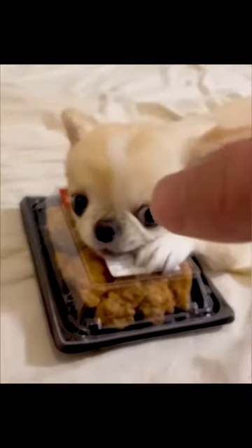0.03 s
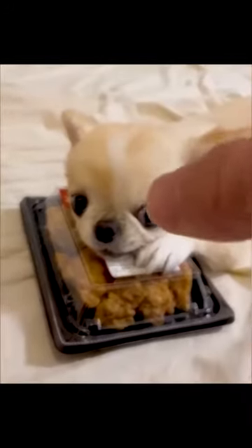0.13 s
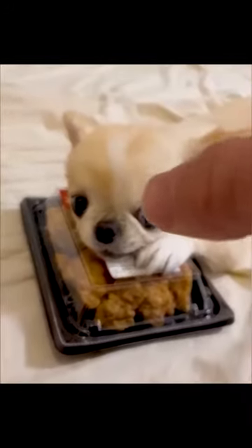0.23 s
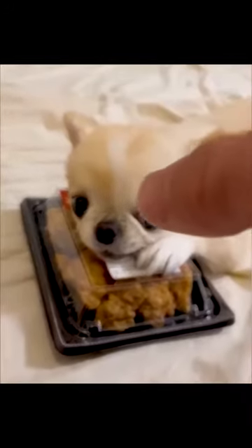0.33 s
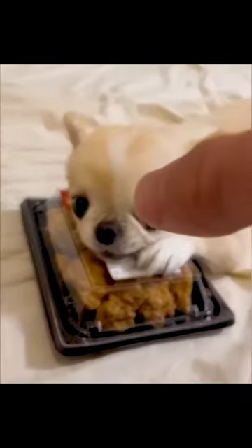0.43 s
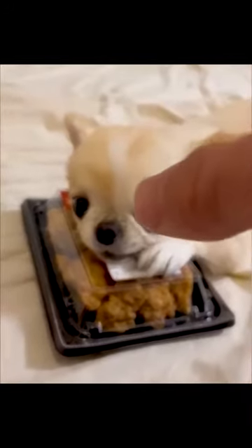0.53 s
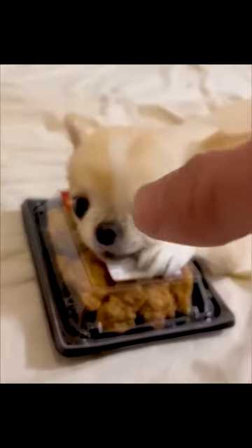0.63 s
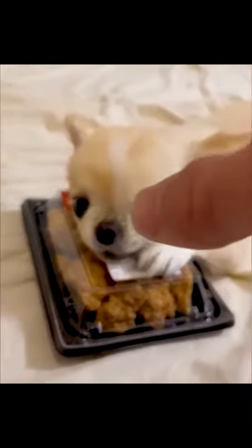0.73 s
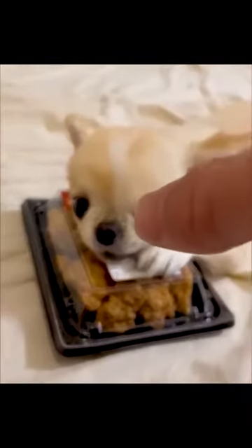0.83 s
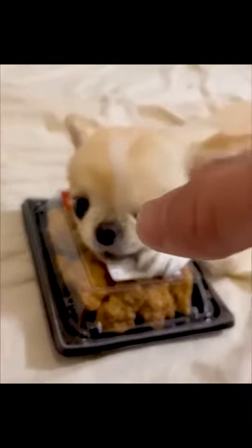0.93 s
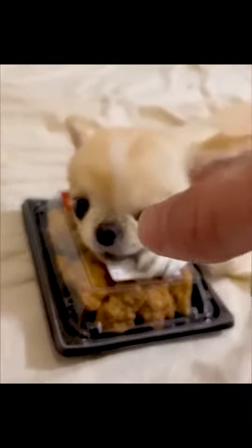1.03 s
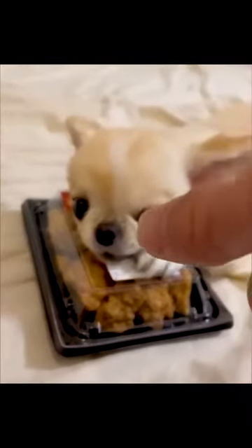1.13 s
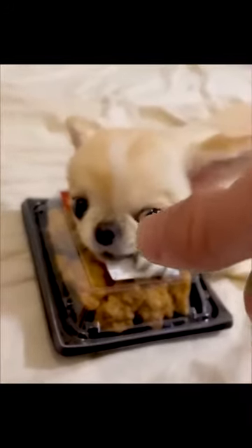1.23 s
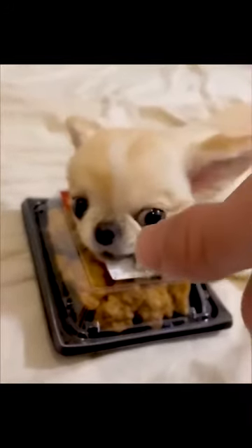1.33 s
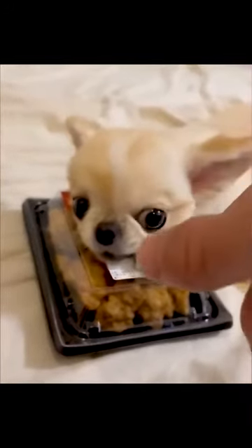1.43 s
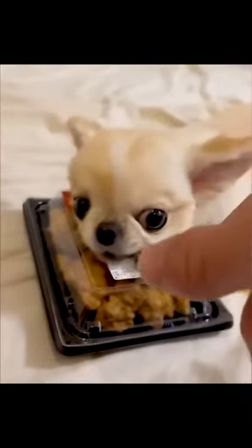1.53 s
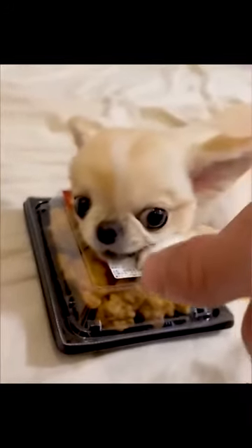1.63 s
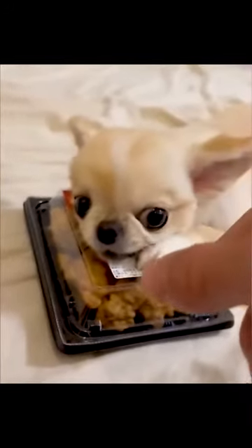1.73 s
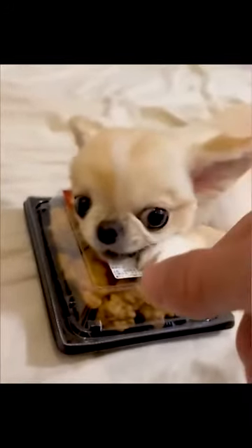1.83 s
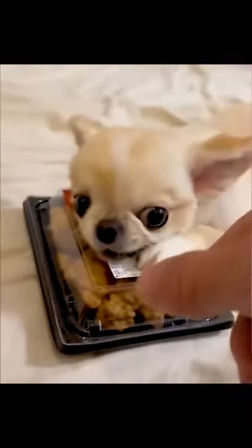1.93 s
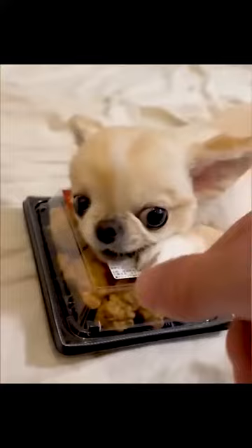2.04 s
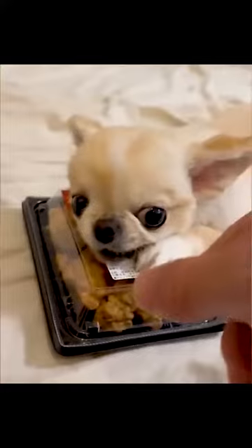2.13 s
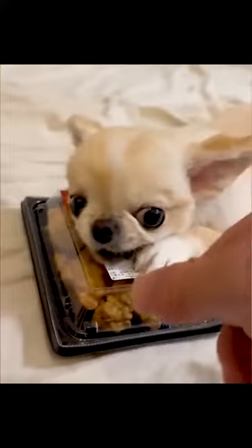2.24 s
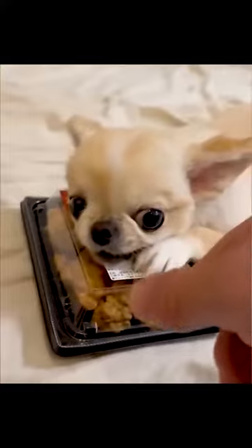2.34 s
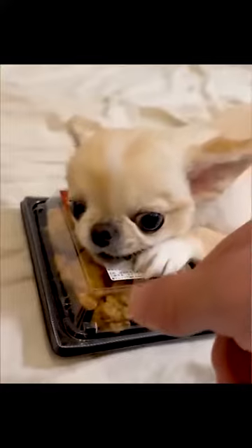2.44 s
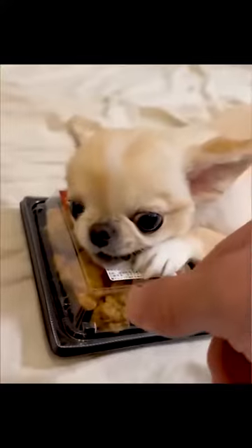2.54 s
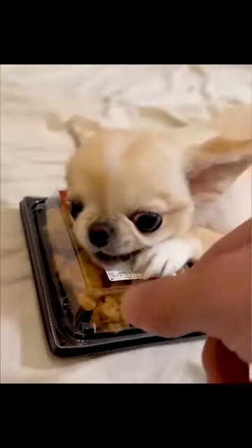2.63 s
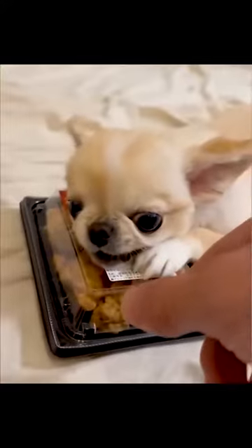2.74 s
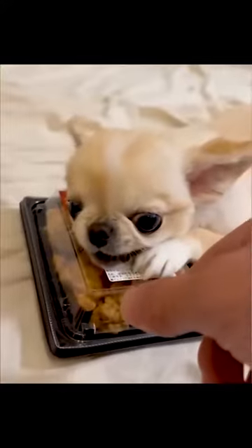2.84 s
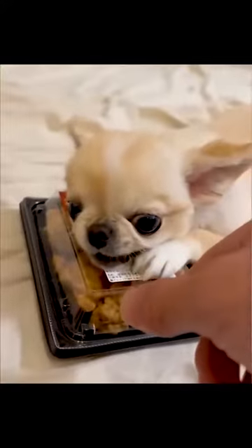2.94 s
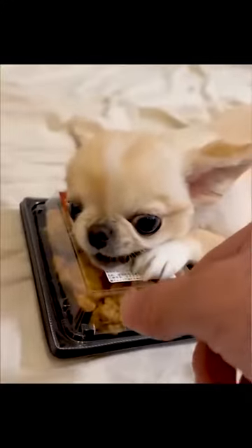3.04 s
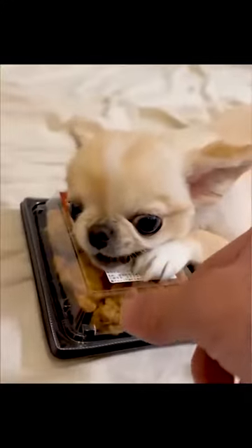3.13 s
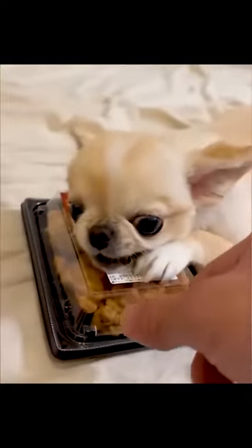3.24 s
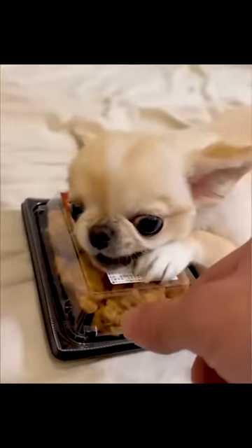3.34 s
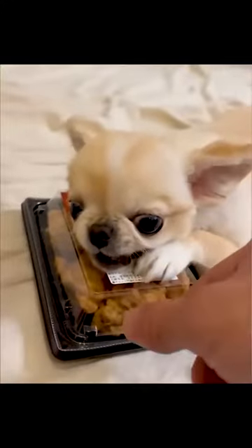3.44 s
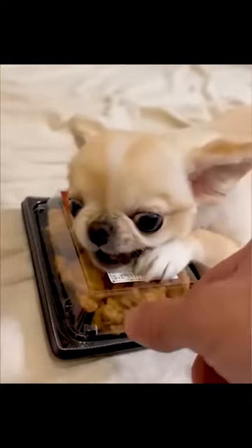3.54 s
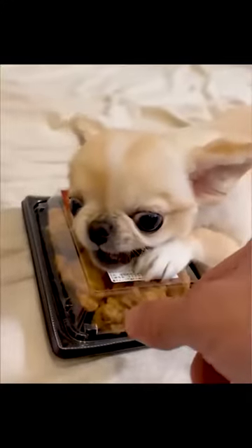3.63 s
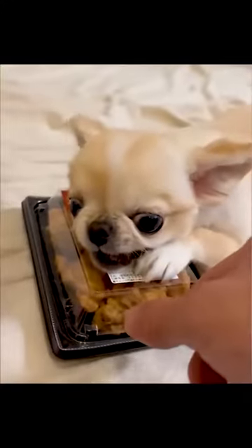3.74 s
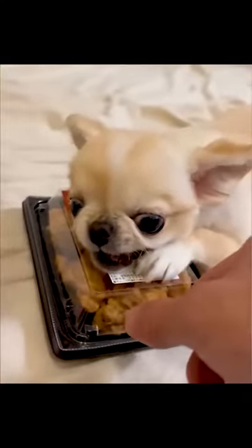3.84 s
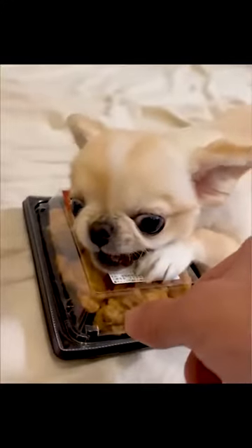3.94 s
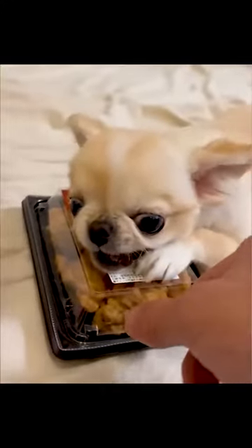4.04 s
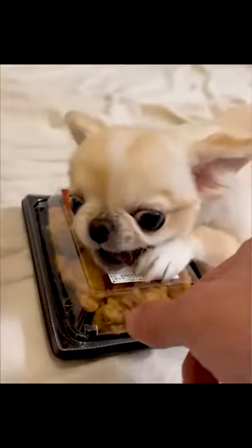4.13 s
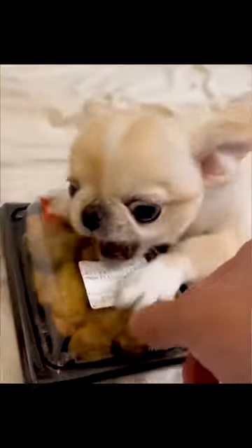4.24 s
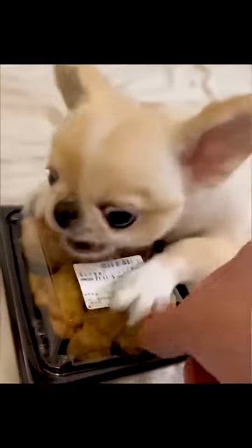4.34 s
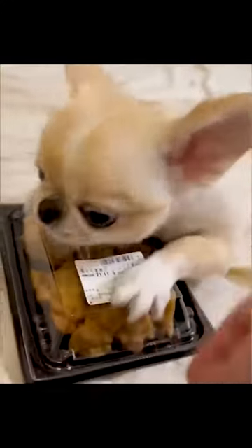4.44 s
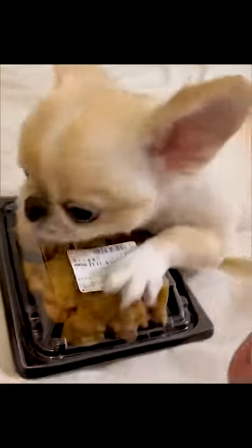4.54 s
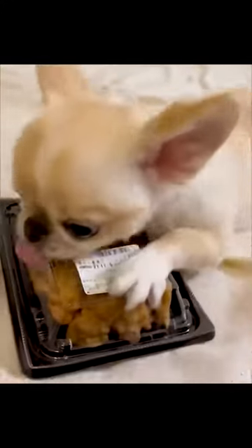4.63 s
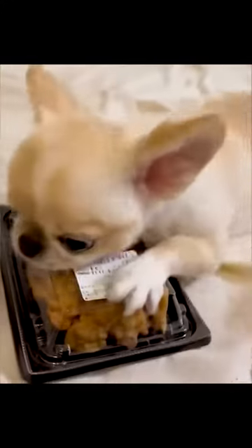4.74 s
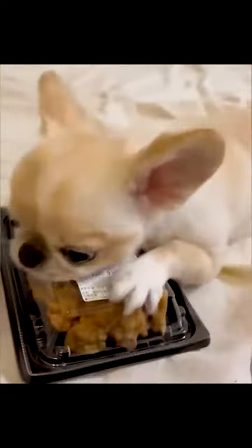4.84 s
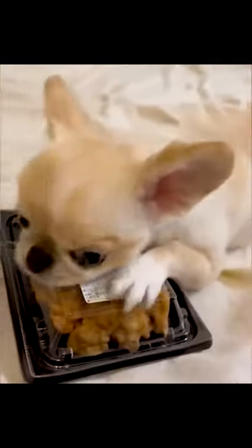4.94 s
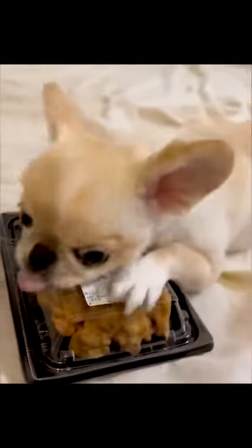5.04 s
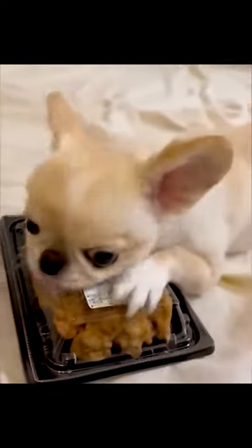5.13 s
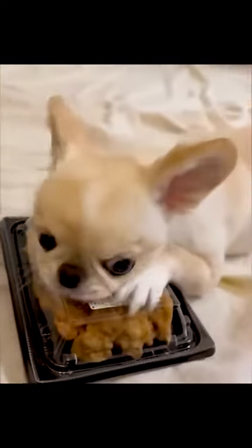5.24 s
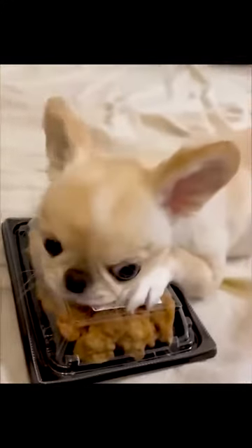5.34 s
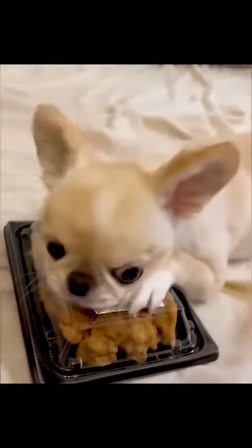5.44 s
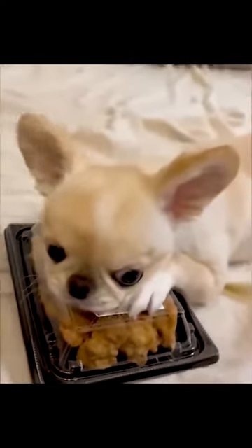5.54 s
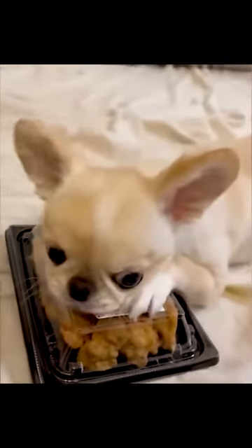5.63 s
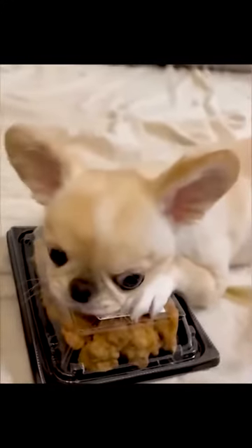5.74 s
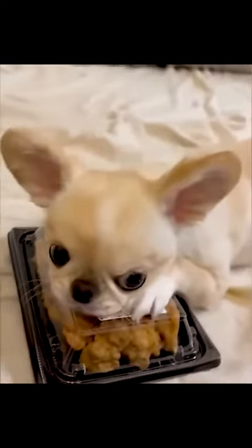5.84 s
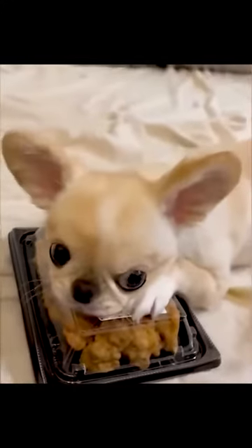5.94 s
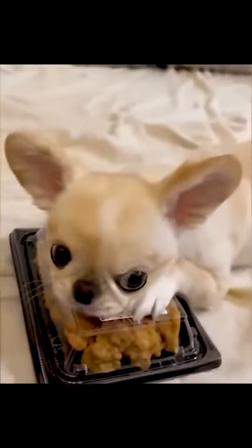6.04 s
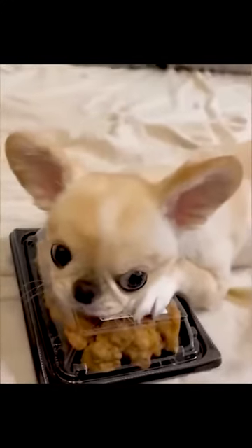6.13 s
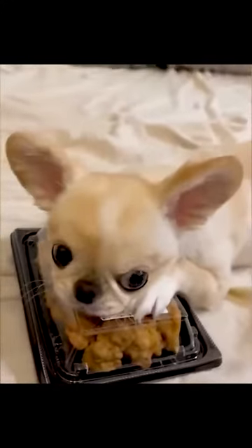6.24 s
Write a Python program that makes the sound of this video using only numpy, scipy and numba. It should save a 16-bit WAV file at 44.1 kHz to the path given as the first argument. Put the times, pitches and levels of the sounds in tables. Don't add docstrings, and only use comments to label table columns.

```python
import sys
import numpy as np
from scipy import signal
from scipy.fft import rfft, irfft
from scipy.io import wavfile
from scipy.ndimage import uniform_filter1d
from numba import njit

SR = 44100
rng = np.random.default_rng(int(sys.argv[2]) if len(sys.argv) > 2 else 0)


def to_wav(s):
    ch = np.atleast_2d(s).T
    pcm = np.round(np.clip(ch, -1, 1) * 32767)
    wavfile.write(sys.argv[1], SR, pcm.astype(np.int16))


def gain_from_db(level_db):
    decades = np.asarray(level_db, float) / 20
    return 10 ** decades


N = 276507
T = np.arange(N) / SR


def curve(table):
    s, *columns = np.transpose(table)
    return [np.interp(T, s, c) for c in columns]


def during(table):
    inside = (T > table[0][0]) & (T < table[-1][0])
    return uniform_filter1d(1. * inside, size=1300)


@njit
def svf(x, hz, width_hz):
    y, b, l = np.empty(len(x)), 0., 0.
    for i in range(len(x)):
        g, k = np.tan(np.pi * hz[i] / SR), width_hz[i] / hz[i]
        v = (b + g * (x[i] - l)) / (1 + g * (g + k))
        b, l, y[i] = 2 * v - b, l + 2 * g * v, k * v
    return y


def ring(x, hz, width_hz):
    narrow = svf(x + 1e-18, hz * np.ones(N), width_hz * np.ones(N))
    return narrow * np.sqrt(SR / np.pi / width_hz)


def steep(x, hz, width_hz, skirt_hz):
    return svf(ring(x, hz, width_hz), hz * np.ones(N), skirt_hz * np.ones(N))


def modes(x, table):
    return sum((-1) ** k * gain_from_db(db) * ring(x, hz, width_hz) for k, (hz, width_hz, db) in enumerate(table))


def high(x, hz):
    return signal.sosfilt(signal.butter(4, hz, "high", fs=SR, output="sos"), x)


def flicker(rate_hz, depth_db):
    k = int(SR / rate_hz)
    steps = np.repeat(rng.standard_normal(N // k + 1), k)
    return gain_from_db(depth_db * uniform_filter1d(steps, k)[:N])


# (time [s], level [dB])
HUM_LEVEL = [(0.0, -65.5), (2.6, -62), (3.0, -68), (4.2, -68), (5.27, -64.5), (6.27, -66.5)]
# (frequency [Hz], density [dB per Hz])
HUM_SPECTRUM = [(12, -38), (20, -18.5), (58, -4.5), (242, -21.5), (440, -21.5), (1160, -32.5), (1360, -40),
                (14000, -49)]


def room_tone():
    f = np.fft.rfftfreq(N, 1 / SR) + 1
    hz, db = np.transpose(HUM_SPECTRUM)
    colour = gain_from_db(np.interp(np.log(f), np.log(hz), db))
    mid, side = rfft(rng.standard_normal((2, N))) * colour
    tone = irfft(mid + np.clip(f / 900, .25, 1) * side * np.array([[1], [-1]]), N)
    return tone / np.std(tone) * gain_from_db(curve(HUM_LEVEL)[0] - 2.0) * flicker(27, 2.0)


# (time [s], length [s], level [dB], start [Hz], end [Hz])
SQUEAK_STROKES = [(.049, 0.011, -61.5, 886, 947), (0.095, 0.0076, -72, 927, 1000),
                  (0.138, 0.013, -64, 885, 950), (0.182, 0.007, -66, 850, 904),
                  (0.266, 0.013, -64.5, 808, 898), (.309, 0.0084, -63, 877, 970),
                  (1.512, .016, -58, 1219, 1073), (1.588, 0.043, -58.5, 1552, 1330),
                  (1.637, 0.039, -59, 1266, 946), (1.932, 0.024, -63, 950, 1058),
                  (1.968, 0.027, -69.5, 800, 920)]
# (time [s], length [s])
FLUTTER_STROKES = [(.402, 0.0377), (.443, 0.033), (.481, 0.0336), (.525, .036), (.578, 0.0242),
                   (.618, 0.03), (.651, 0.046), (.695, .034), (.748, 0.025), (.786, 0.041), (.868, .085),
                   (.955, 0.03), (.984, 0.04), (1.03, 0.031), (1.074, 0.063), (1.142, 0.027),
                   (1.173, 0.027), (1.212, 0.026), (1.239, 0.025), (1.265, 0.0232), (1.291, .029),
                   (1.342, .034), (1.379, 0.072), (1.451, 0.041), (1.689, .028), (1.731, 0.037),
                   (1.775, 0.031), (1.822, 0.038), (1.86, 0.023)]
# (time [s], level [dB])
BREATH_PULL = [(.4, -60), (.7, -59), (.8, -59.5), (1.15, -59), (1.32, -61.5), (1.449, -59), (1.9, -63)]
FLUTTER_HZ, FLUTTER_ARCH_HZ, FLUTTER_SPREAD_HZ, FLUTTER_SPREAD_DB = 826, 174, 53, 3.5


def breaths():
    chance = rng.standard_normal((len(FLUTTER_STROKES), 4))
    starts = np.array(FLUTTER_STROKES)[:, 0]
    db = np.interp(starts, *np.transpose(BREATH_PULL)) + FLUTTER_SPREAD_DB * chance[:, 0]
    arch = FLUTTER_HZ + FLUTTER_SPREAD_HZ * chance[:, 1:] + FLUTTER_ARCH_HZ * np.array([0, 1, 0])
    flutter = list(np.column_stack([FLUTTER_STROKES, db, arch]))
    return flutter + [(s, length, level, a, (a + b) / 2, b) for s, length, level, a, b in SQUEAK_STROKES]


# (time [s], air share [0-1])
WHISTLE_AIR = [(0, .1), (.45, .16), (.6, .6), (1.0, .4), (1.5, .6), (1.51, .1), (1.64, .25), (1.72, .6),
               (1.95, .25)]
# (frequency [Hz], width [Hz], level [dB])
NOSE_MODES = [(950, 455, -0.5), (1443, 790, -3), (2320, 320, -10), (4400, 340, -17.5)]


def whistle():
    hz, gain = np.full(N, 900.), np.zeros(N)
    for s, length, db, *arch in breaths():
        inside = slice(int(s * SR), int((s + length + 0.001464) * SR))
        u = np.linspace(-.25, 2.25, len(T[inside]))
        hz[inside] = np.polyval(np.polyfit(np.arange(3), arch, 2), u)
        gain[inside] = gain_from_db(db)
    gain = uniform_filter1d(gain, size=150)
    air, = curve(WHISTLE_AIR)
    wobble = 1 + 0.1054 * air * uniform_filter1d(rng.standard_normal(N), size=200) * np.sqrt(200)
    phase = 2 * np.pi * np.cumsum(uniform_filter1d(hz, size=150) * wobble) / SR
    buzz = sum(np.sin(k * phase) + air * np.sin((k + .5) * phase) for k in (1, 2, 3))
    squeak = gain_from_db(-17.0) * modes(buzz, NOSE_MODES)
    hoarse = high(modes(rng.standard_normal(N), NOSE_MODES), 460) * flicker(130, 3.2)
    return gain * (2.11 * np.sqrt(1 - air) * squeak + 1.06 * np.sqrt(air) * hoarse)


# (start [s], roughness [0-1], mouth resonance width [Hz])
POSTURE_STEPS = [(2.2, .12, 280), (3.565, .06, 120), (4.17, .1, 200), (4.21, .9, 260), (4.47, .25, 220),
                 (4.62, .14, 130), (4.83, .06, 110), (4.885, .18, 150), (5.1, .4, 200), (5.22, .2, 250),
                 (5.335, .3, 300), (5.42, .15, 300)]


def posture(values):
    starts = np.array(POSTURE_STEPS)[:, 0]
    now = np.maximum(np.searchsorted(starts, T) - 1, 0)
    return uniform_filter1d(np.array(values, float).T[:, now], size=660)


# (time [s], length [s], level [dB])
GROWL_STROKES = [(2.267, 0.011, -26), (2.316, 0.0078, -27), (2.362, 0.012, -29), (2.396, 0.028, -26.5),
                 (2.433, 0.041, -29), (2.473, 0.046, -30), (2.521, 0.042, -29.5), (2.571, 0.031, -31),
                 (2.624, 0.033, -30), (2.674, 0.021, -29.5), (2.719, 0.02, -30), (2.771, 0.012, -27),
                 (2.811, 0.027, -29.5), (2.862, 0.019, -31.5), (2.887, 0.035, -28), (2.96, 0.023, -27.5),
                 (2.989, .066, -29), (3.084, .061, -30), (3.149, 0.024, -31), (3.242, .013, -29),
                 (3.463, 0.0074, -28), (3.501, 0.012, -26.5), (3.542, 0.017, -27)]
SNARL_STROKES = [(3.571, 0.041, -19), (3.61, 0.03, -18.5), (3.649, 0.036, -18.5), (3.686, .048, -16),
                 (3.734, 0.046, -16.5), (3.785, 0.033, -17), (3.819, 0.032, -17), (3.851, .048, -17),
                 (3.921, 0.027, -16), (3.966, 0.027, -17), (3.992, 0.039, -18), (4.029, 0.038, -18),
                 (4.097, 0.022, -16), (4.122, 0.063, -20), (4.177, 0.025, -27.5), (4.221, 0.031, -34),
                 (4.249, 0.029, -24), (4.273, 0.048, -18.5), (4.311, 0.033, -17.5), (4.344, 0.049, -16.5),
                 (4.39, 0.022, -18), (4.49, 0.0039, -16.5)]
GRUMBLE_STROKES = [(4.517, 0.027, -20), (4.554, 0.051, -31), (4.637, 0.031, -34.5), (4.683, 0.0405, -28.5),
                   (4.736, 0.035, -24), (4.787, 0.04, -25.5), (4.84, .039, -24.5), (4.882, 0.056, -34),
                   (4.953, 0.053, -27.5), (5.005, .042, -31.5), (5.047, .045, -29), (5.11, 0.016, -27),
                   (5.129, 0.029, -28), (5.162, 0.0434, -28), (5.238, 0.051, -30), (5.286, 0.044, -44),
                   (5.347, .004, -57), (5.374, 0.016, -49.5), (5.453, 0.0051, -40)]
# (time [s], level [dB])
FLAP_CLICKS = [(2.236, -33.5), (3.058, -33), (3.217, -26.5), (3.338, -26), (3.419, -26)]
# (time [s], pitch [Hz])
GROWL_PITCH = [(2.24, 271.7), (2.62, 280.6), (2.72, 252.4), (2.92, 266.3), (3.25, 241.7), (3.33, 271),
               (3.52, 262.7)]
SNARL_PITCH = [(3.58, 322), (3.7, 333.3), (4.1, 292.3), (4.165, 261.2), (4.205, 156.3), (4.23, 124.2),
               (4.45, 125.8), (4.48, 261.6), (4.545, 270.8)]
GRUMBLE_PITCH = [(4.56, 210.9), (4.61, 182.6), (4.67, 183.2), (4.74, 239.7), (4.86, 246.6), (5.08, 205.3),
                 (5.18, 179.5), (5.23, 125.3), (5.46, 121)]
STROKE_FADE_DB = (-1.5, -0.17, -2)
STROKE_GLIDE = (-.02, -.01, .035)
FLAP_POP_DB = (1.5, -2, 1.65)
CLICK_S, STROKE_SPREAD = .002, .025
SHUT_S = 4.51


def folds(rough):
    pulses, flow = np.zeros(N), np.zeros(N)
    line, = curve(GROWL_PITCH + SNARL_PITCH + GRUMBLE_PITCH)
    pitch = line.copy()
    tables = (GROWL_STROKES, SNARL_STROKES, GRUMBLE_STROKES)
    strokes = []
    for table, *rule in zip(tables, STROKE_FADE_DB, STROKE_GLIDE, FLAP_POP_DB):
        strokes += [(*row, *rule) for row in table]
    strokes += [(s, CLICK_S, db, 0, 0, 0) for s, db in FLAP_CLICKS]
    chance = np.clip(rng.standard_normal((len(strokes), 40, 2)), -2, 2)
    for (s, length, db, fade_db, glide, pop_db), draws in zip(strokes, chance):
        miss = STROKE_SPREAD * draws[-1]
        at = s + .0005
        for stretch, size in draws:
            u = 2 * (at - s) / length - 1
            if u > .95:
                break
            i = int(at * SR)
            r = rough[i]
            gain = gain_from_db(db + fade_db * u + pop_db * (at < s + .001) + 5.0 * min(r, .4) * size)
            gain *= 1 - .6 * u ** 4 * (s > SHUT_S and length > .015)
            arch = .15 * u ** 2 * min(length / .04, 1)
            hz = line[i] * (1.045 + miss[0] + (glide + miss[1]) * u - arch)
            between = at * SR % 1
            pulses[i:i + 2] += gain * np.sqrt(SR / hz) * np.array([1 - between, between])
            step = (1 + .12 * r * stretch) / hz
            flow[i:int(min(at + step, s + length) * SR)] = gain
            pitch[i:i + int(2 * step * SR)] = hz
            at += step
    return pulses, uniform_filter1d(flow, size=60), uniform_filter1d(pitch, size=200)


# (time [s], resonance [Hz])
MOUTH_RESONANCE = [(2.24, 1320), (2.5, 1350), (2.73, 1230), (3.3, 1280), (3.51, 1380), (3.59, 1716),
                   (3.8, 1878), (4.11, 1825), (4.26, 1646), (4.49, 1570), (4.65, 343), (4.755, 493),
                   (4.86, 1033), (4.98, 425), (5.03, 583), (5.29, 773), (5.345, 1820), (5.44, 878)]
# (chest [dB], mouth [dB], palate [dB], teeth [dB])
POSTURE_SHARES = [(-11, -1, -2, -3), (-12.5, -0.9, -5.5, -5), (-3.5, -11, -10, -8), (-3.5, -3, -9, -7.5),
                  (-2, -1.5, -4.5, -18), (1.5, -1, -5.5, -25), (-3.5, 0, -24, -21.5), (2.5, -3, 1, -22.5),
                  (-0.5, -6.5, -1.8, -27), (3, -9, -37, -21), (-6, 0, 0, -13), (-3.5, 4.5, 7.5, -38.5)]
# (frequency [Hz], width [Hz], level [dB])
TEETH_MODES = [(3000, 800, -13.5), (4617, 610, -5), (6710, 780, -8.5), (9190, 2600, -3.5)]
# (frequency [Hz], width [Hz], level [dB])
NOSTRIL_MODES = [(2945, 620, -5.5), (5490, 550, -8), (10000, 2300, 1)]
# (time [s], resonance [Hz])
CHEEK_ROAR = [(4.25, 3200), (4.4, 4400)]
PALATE_WIDTH_HZ, LEAK_DB = 1770, -14.5
NOSE_AIR_DB_PER_OCTAVE = 6


def voice():
    mouth_hz, = curve(MOUTH_RESONANCE)
    chest_db, mouth_db, palate_db, teeth_db = posture(POSTURE_SHARES)
    _, rough, mouth_width_hz = posture(POSTURE_STEPS)
    teeth_db = teeth_db + NOSE_AIR_DB_PER_OCTAVE * np.log2(mouth_hz / 700) * (T > SHUT_S)
    pulses, flow, pitch = folds(rough)
    fade = np.exp(-1 / (0.0011 * SR))
    gusts = signal.lfilter([np.sqrt(1 - fade ** 2)], [1, -fade], pulses)
    effort = uniform_filter1d(flow, size=3500)
    rush = rough * flow * flicker(240, 1.2)
    leak = gain_from_db(LEAK_DB) * 2 * effort
    puff = ((1 - rough) * gusts + rush + leak) * rng.standard_normal(N)
    drive = np.sqrt(1 - rough) * pulses + np.sqrt(rough) * puff
    chest = steep(pulses, pitch, 220, 370)
    palate_hz = np.minimum(0.74 * mouth_hz, 800)
    palate = high(steep(drive, palate_hz, PALATE_WIDTH_HZ, .5 * mouth_hz), 300)
    mouth = steep(drive, mouth_hz, mouth_width_hz, .45 * mouth_hz)
    jet = .7 * (1 - rough ** 2) * pulses + .7 * puff
    roar = gain_from_db(4.0) * rough ** 2 * steep(puff, curve(CHEEK_ROAR)[0], 2200, 4000)
    roar = roar + gain_from_db(9.0) * effort * steep(jet, 11300, 1100, 2500)
    nose_air = modes(puff + flow * rng.standard_normal(N), NOSTRIL_MODES)
    hiss = np.where(T < SHUT_S, modes(jet, TEETH_MODES), nose_air)
    hiss = signal.sosfilt(signal.butter(7, 10200, fs=SR, output="sos"), hiss)
    teeth = high(hiss + roar, 2200)
    low = gain_from_db(chest_db - 3.5) * chest - gain_from_db(palate_db) * palate
    return low + gain_from_db(mouth_db) * mouth + gain_from_db(teeth_db - 3.5) * teeth


# (time [s], drumming [dB], thud [dB])
LUNGE_KNOCKS = [(4.21, -51, -85), (4.294, -36, -44), (4.4, -30, -51.5), (4.46, -43.5, -52),
                (4.58, -44, -43.5), (5.6, -75, -68.5)]
# (time [s], level [dB])
CLOTH_RUSTLE = [(4.4, -59.5), (5.272, -64), (6.0, -81.5)]
# (time [s], level [dB])
SNIFF_LEVEL = [
    (5.8, -83),
    (5.918, -69.5),
    (6.0, -102),
]


def body():
    drum_db, thud_db = curve(LUNGE_KNOCKS)
    noise = rng.standard_normal((4, N))
    drum = gain_from_db(drum_db - 6.5) * steep(noise[0], 122, 30, 42)
    mattress = gain_from_db(thud_db + 0.5) * steep(noise[1], 87, 30, 50)
    cloth = gain_from_db(curve(CLOTH_RUSTLE)[0]) * flicker(30, 0.99) * high(ring(noise[2], 4500, 9800), 401.2)
    sniff = gain_from_db(curve(SNIFF_LEVEL)[0]) * ring(noise[3], 1400, 1020)
    knocks = (drum + mattress) * during(LUNGE_KNOCKS)
    return knocks + cloth * during(CLOTH_RUSTLE) + sniff * during(SNIFF_LEVEL)


def thud():
    rumble = np.array([high(ring(n, 49, 43), 62) for n in rng.standard_normal((2, N))])
    return gain_from_db(curve(LUNGE_KNOCKS)[1] + 4.5) * during(LUNGE_KNOCKS) * rumble


# (frequency [Hz], level [dB])
PORT_LEVEL = [(60, 1.0), (200, -0.5), (380, -2.5), (700, -2.5), (1290, -5.0), (2380, -3.5), (4400, -6.5),
              (8120, -0.5)]
# (frequency [Hz], phase [rad])
PORT_LEAD = [(0, 0), (1900, 0), (2900, -1.5), (4400, -.4), (8400, -.3), (12000, 6.3)]


def ports(x):
    f = np.fft.rfftfreq(N, 1 / SR)
    hz, level_db = np.transpose(PORT_LEVEL)
    db = np.interp(np.log(f + 1), np.log(hz), level_db)
    turn = gain_from_db(db / 2) * np.exp(.5j * np.interp(f, *np.transpose(PORT_LEAD)))
    return irfft(rfft(x) * np.array([turn, 1 / turn]), N)


def scatter(x):
    t = T[:400]
    echoes = rng.standard_normal((2, len(t))) * gain_from_db(-60 * t / 0.022)
    echoes = echoes / np.sqrt(np.sum(echoes ** 2) / 2)
    sway = uniform_filter1d(rng.standard_normal((2, N)), size=1500) * np.sqrt(1500)
    return gain_from_db(-6.0) * sway * signal.fftconvolve(high(x, 1900)[None], echoes, axes=1)[:, :N]


ROOM_T60_S, TREBLE_T60_S, ROOM_DB = 0.25, 0.038, -11.5


def room(x):
    t = T[:SR // 2]
    noise = rng.standard_normal((2, len(t))) * np.clip(t / 0.0015, 0, 1)
    dull = signal.lfilter([.3], [1, -.7], noise)
    tail = dull * gain_from_db(-60 * t / ROOM_T60_S) + 3.1 * noise * gain_from_db(-60 * t / TREBLE_T60_S)
    tail = tail / np.sqrt(np.sum(tail ** 2) / 2)
    return gain_from_db(ROOM_DB) * signal.fftconvolve(x[None], tail, axes=1)[:, :N]


def scene():
    dog = whistle() + voice() + body()
    return ports(dog) + scatter(dog) + thud() + room(dog) + room_tone()


def top_cut(x):
    return signal.sosfilt(signal.butter(12, 16490, fs=SR, output="sos"), x)


def record(dry):
    heard = signal.sosfilt(signal.butter(4, 12500, fs=SR, output="sos"), dry)
    return top_cut(heard)


dry = scene()
out = record(dry)
to_wav(out)
```